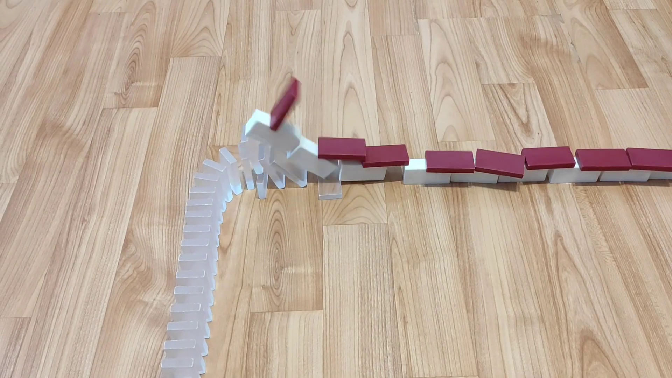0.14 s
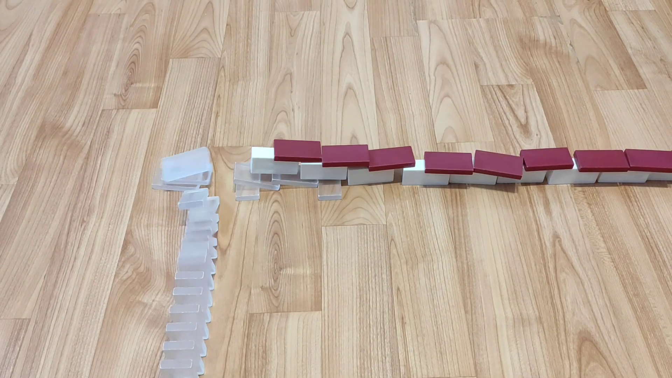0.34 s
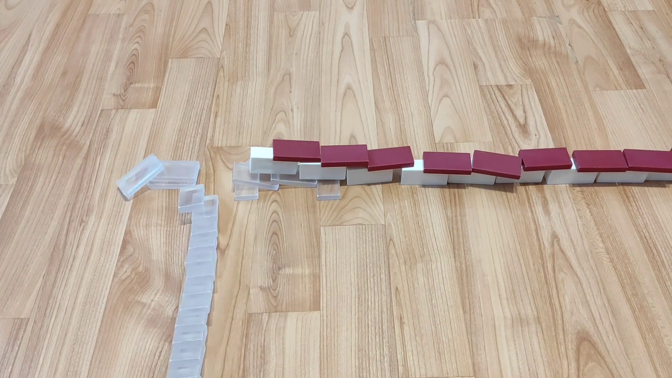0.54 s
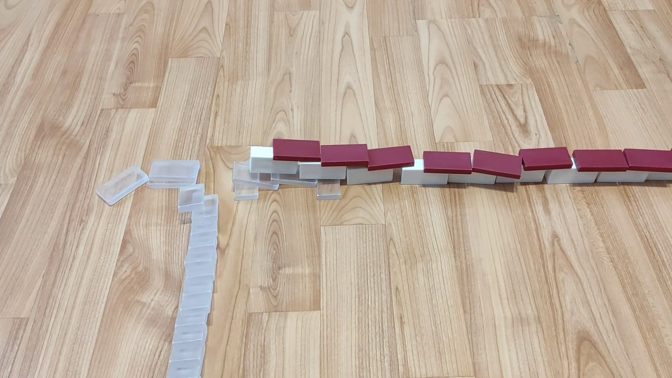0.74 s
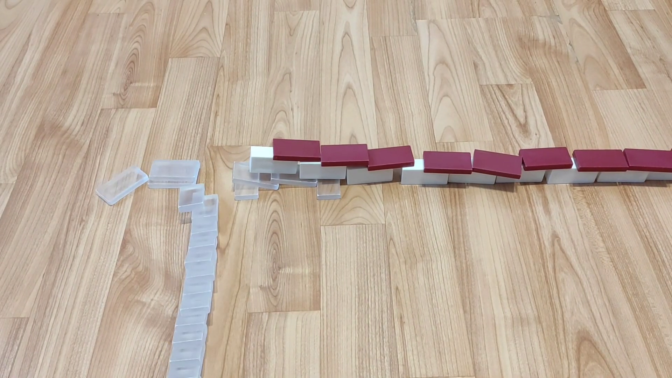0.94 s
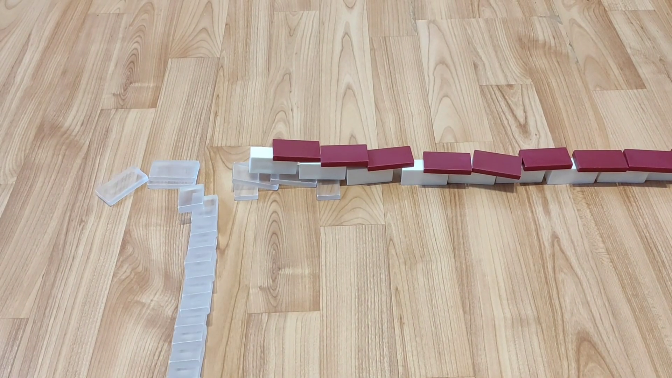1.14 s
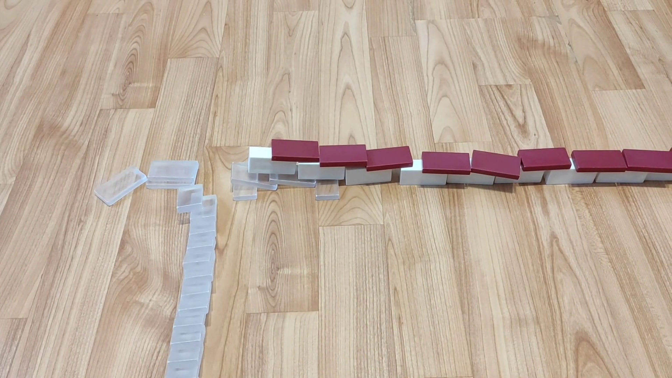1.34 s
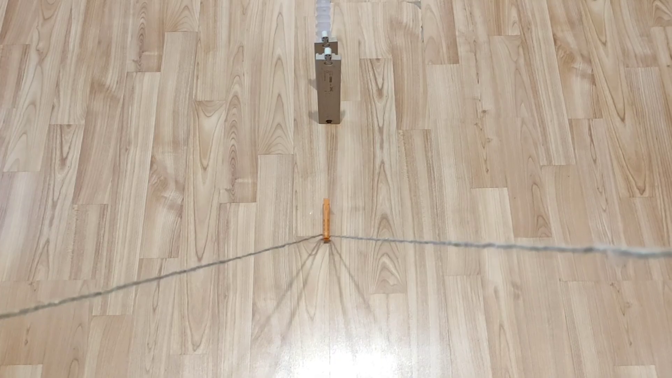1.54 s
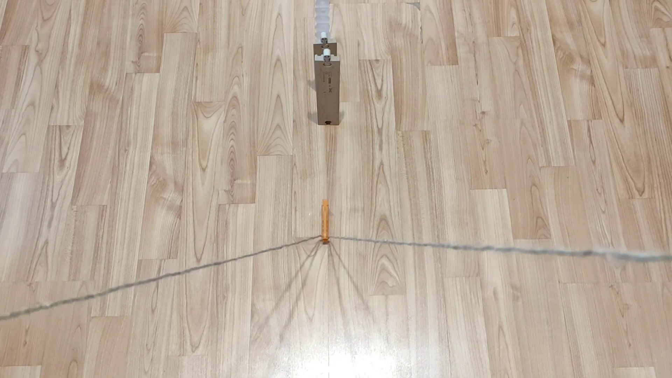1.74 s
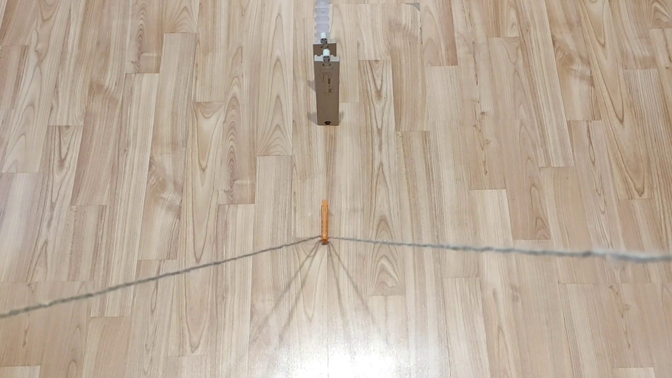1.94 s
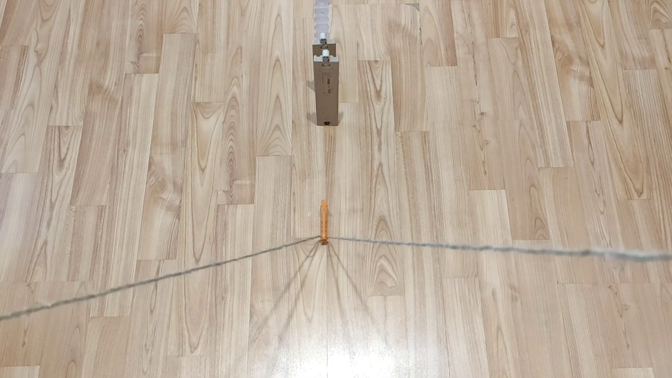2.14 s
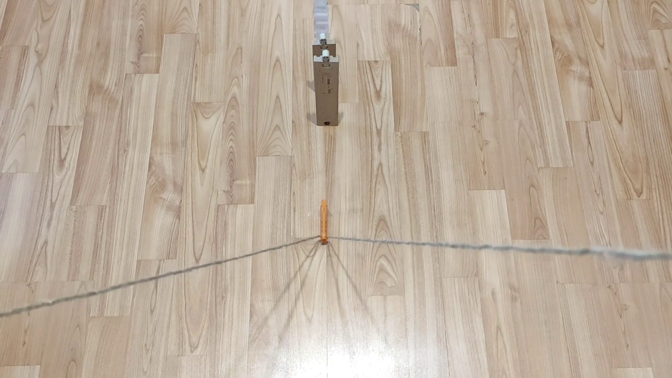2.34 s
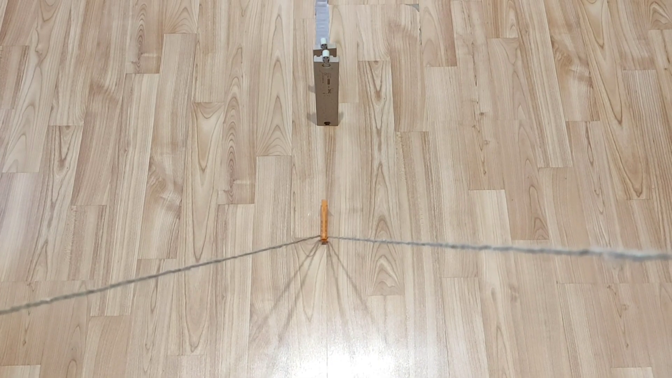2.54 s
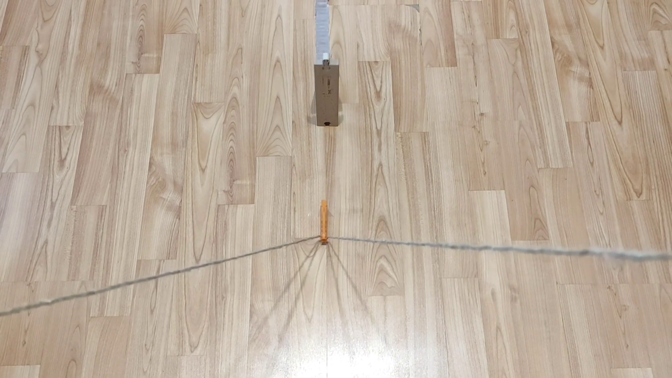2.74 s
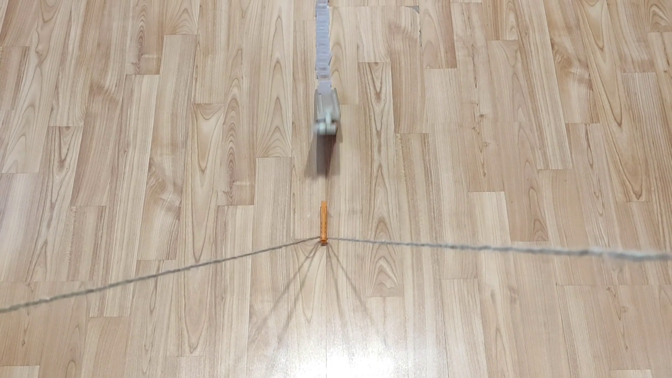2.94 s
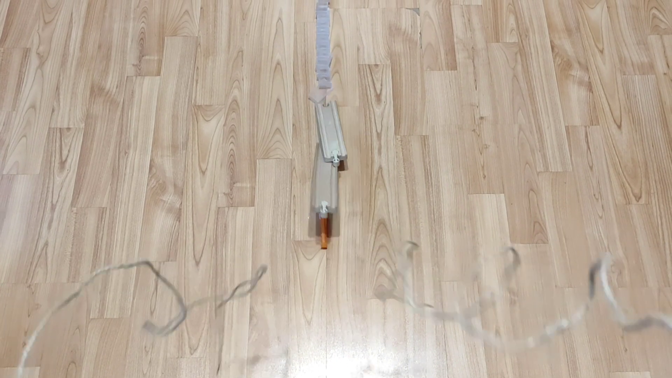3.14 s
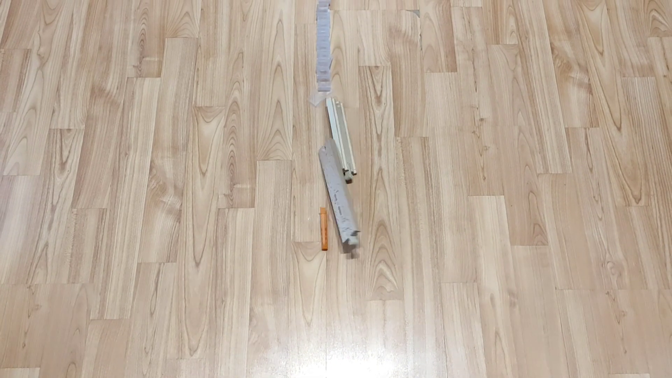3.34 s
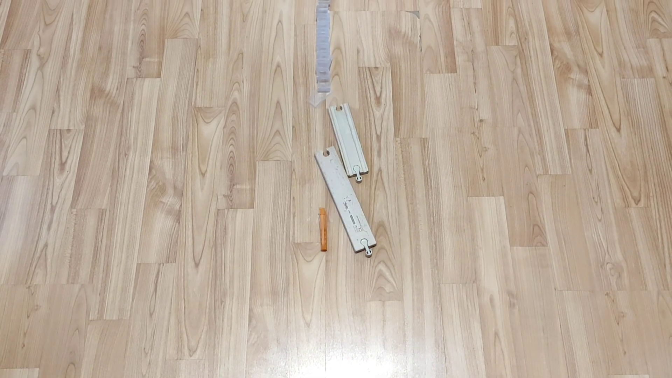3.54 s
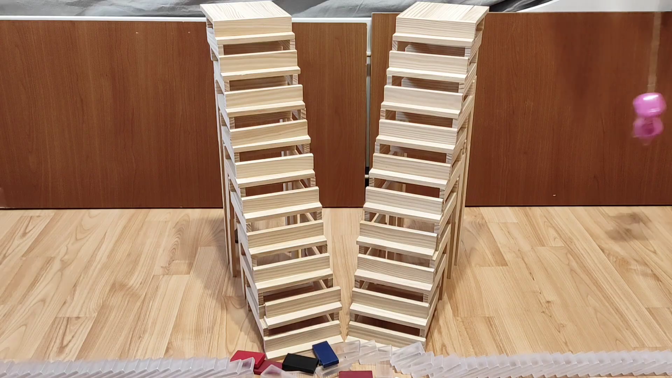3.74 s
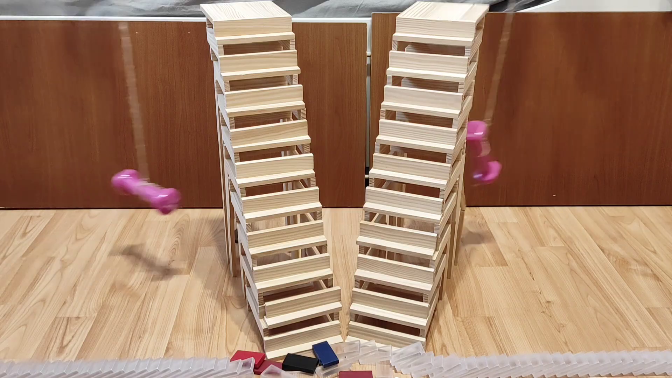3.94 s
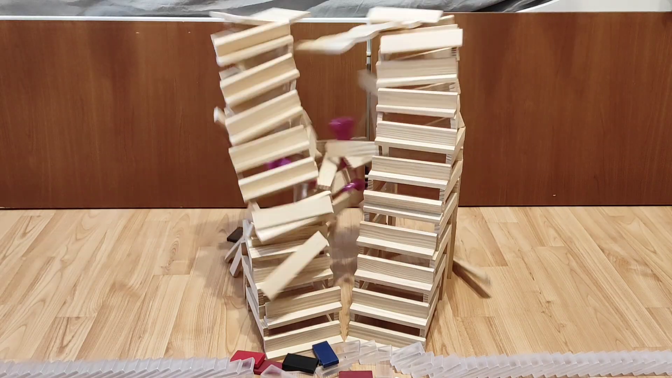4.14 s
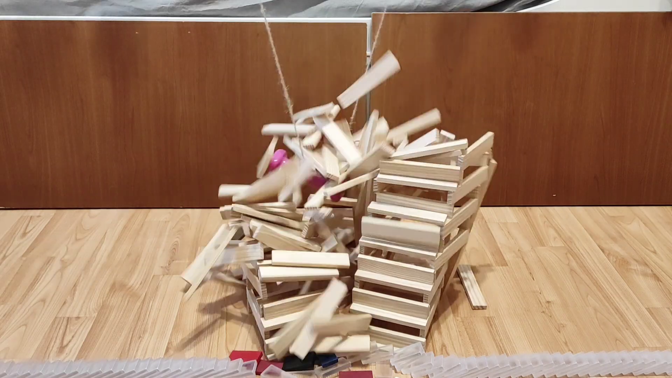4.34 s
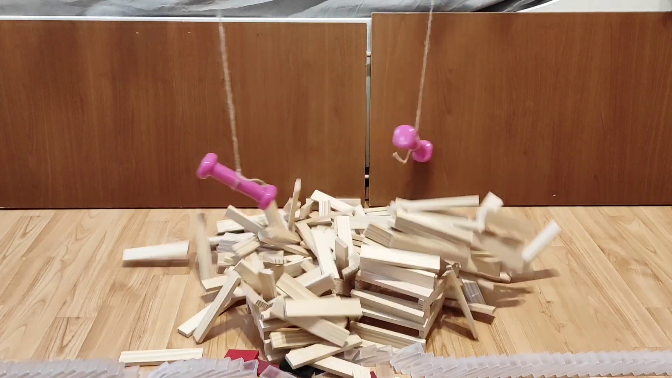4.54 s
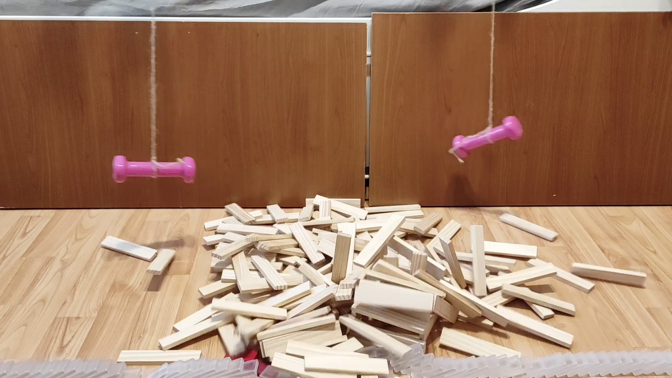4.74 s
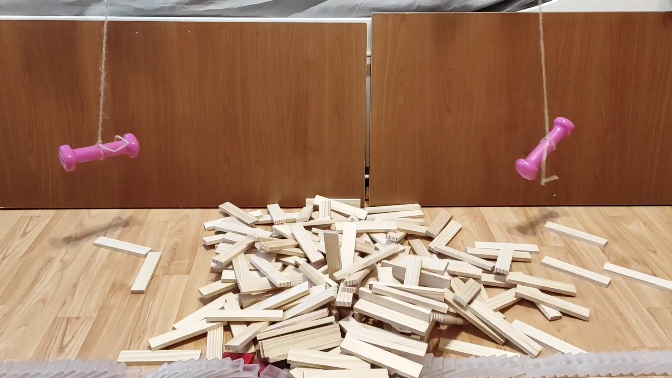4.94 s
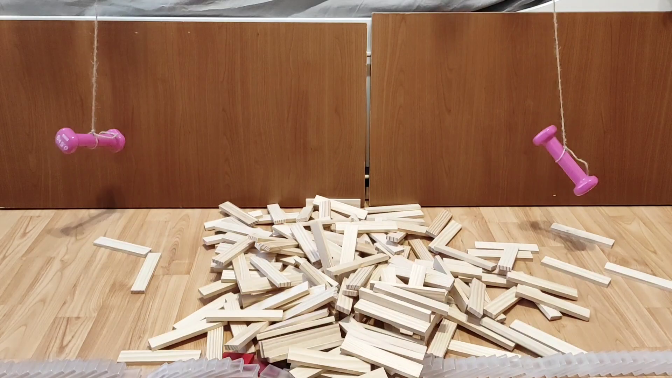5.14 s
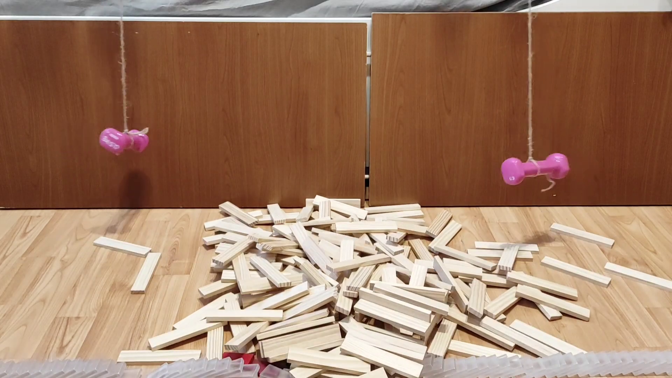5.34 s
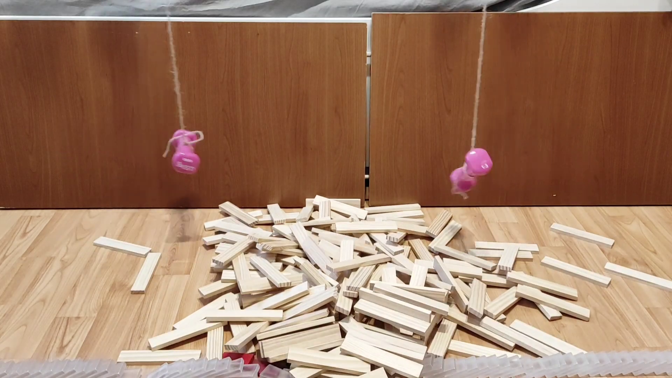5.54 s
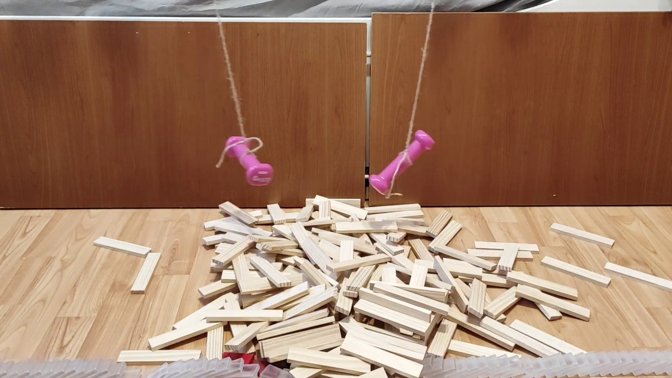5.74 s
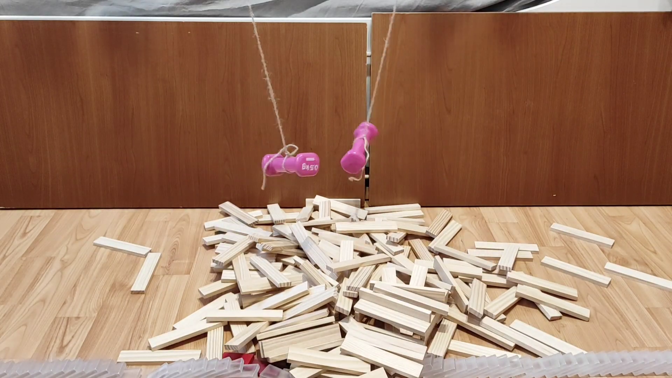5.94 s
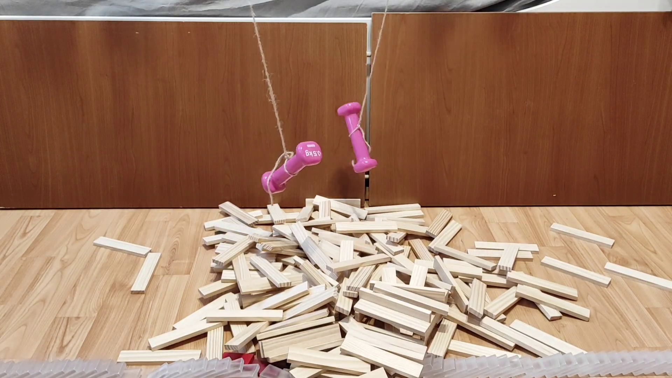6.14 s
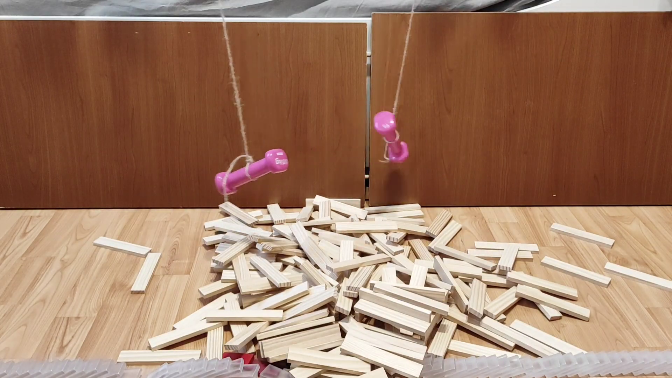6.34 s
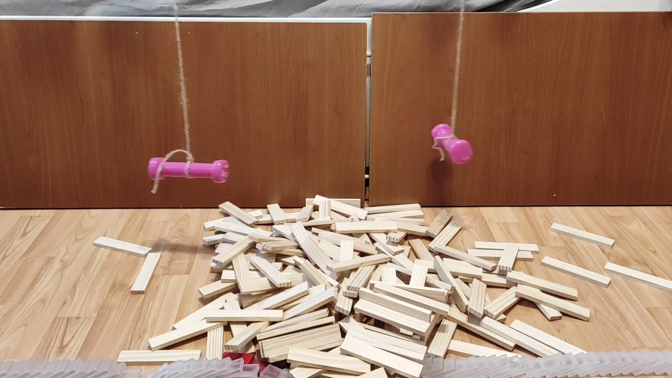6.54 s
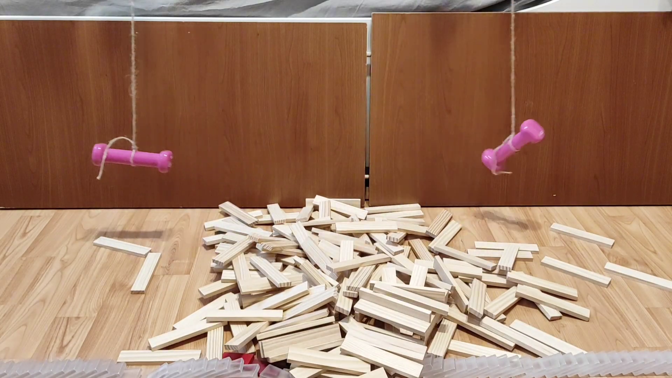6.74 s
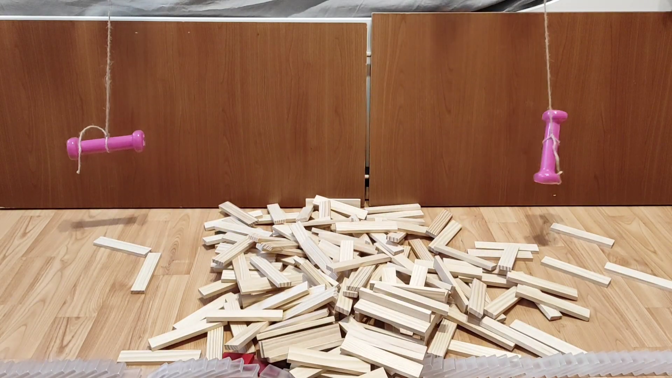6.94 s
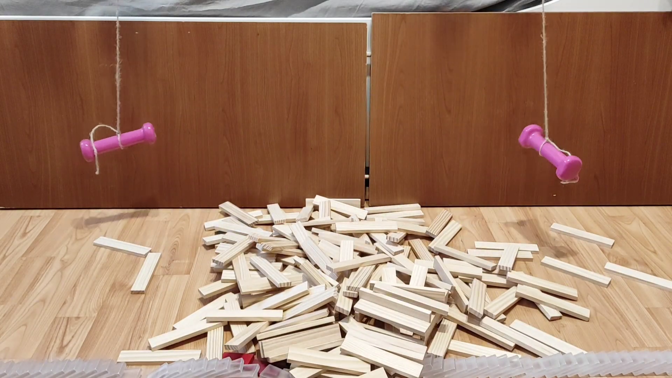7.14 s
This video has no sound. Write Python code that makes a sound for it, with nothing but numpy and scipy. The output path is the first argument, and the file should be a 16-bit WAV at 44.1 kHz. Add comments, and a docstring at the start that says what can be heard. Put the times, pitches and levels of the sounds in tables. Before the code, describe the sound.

Fast, even plastic domino clatter on a laminate floor, a short lull, a few wooden knocks, then a loud cascade of collapsing wooden planks.

```python
"""A chain reaction on a laminate floor in a small room, over house murmur and microphone hiss (shaped noise).
0 s: stacked blocks tumble. 0.24 s: a long row of plastic dominoes topples at a nearly even pace.
2.8 s: two wooden track pieces are knocked over; from 3.5 s one bounces. 4 s: swinging weights bring down
two towers of wooden planks, until 5.4 s; the murmur stays. Contacts are noise bursts with thud, clack, tick,
ringing modes and a room tail; clear knocks are decaying tone pairs; low shudder follows the clatter."""
import sys
import numpy as np
from scipy import signal
from scipy.fft import rfft, irfft
from scipy.io import wavfile

SR = 44100
rng = np.random.default_rng(int(sys.argv[2]) if len(sys.argv) > 2 else 0)


def store_pcm(level_fs):
    """Save levels as 16-bit WAV."""
    pcm = np.round(np.clip(level_fs, -1, 1) * 32767).astype(np.int16)
    wavfile.write(sys.argv[1], SR, np.atleast_2d(pcm).T)


N = 321048


def from_db(db):
    """Decibels to amplitude gain; 2 * dB gives the power gain."""
    return 10 ** (np.asarray(db) / 20)


def in_time(rows, outside):
    """Value columns of a (t/s, ...) table, interpolated per sample; outside=None holds the end values."""
    t_s, *columns = np.transpose(rows)
    return np.array([np.interp(np.arange(N) / SR, t_s, c, outside, outside) for c in columns])


def at_hz(points, hz):
    """Read a (f/Hz, value) table on a log-frequency axis."""
    table_hz, values = np.array(points).T
    return np.interp(np.log(hz + 1e-9), np.log(table_hz), values)


def spread_over(energy, seconds):
    """Energy let out along an exponential of the given time constant."""
    fade = np.exp(-1 / (seconds * SR))
    return signal.lfilter([1 - fade], [1, -fade], energy + 1e-30)


def stereo_noise(size, likeness):
    """Spectra of two noises with the given left-right correlation at each frequency."""
    hz = np.arange(size // 2 + 1) * SR / size
    mid, side = rfft(rng.standard_normal((2, size)))
    alike = np.clip(at_hz(likeness, hz), -1, 1)
    return hz, np.sqrt(1 + alike) * mid + np.sqrt(1 - alike) * side * [[1], [-1]]


def resonance(x, hz, width_hz):
    """Two-pole resonance, gain 1 on top."""
    r = np.exp(-np.pi * width_hz / SR)
    numerator = np.array([1, 0, -1]) * (1 - r * r) / 2
    return signal.lfilter(numerator, [1, -2 * r * np.cos(2 * np.pi * hz / SR), r * r], x)


def random_contacts(per_s, spread_db):
    """Contacts at random moments, a few much harder than the rest; mean power 1."""
    hardness_db = spread_db * np.minimum(rng.exponential(1, N), 3.0)
    energy = from_db(2 * hardness_db) * (rng.random(N) < per_s / SR)
    return energy / energy.mean()


def thud_clack_tick(strength_db, sharpness_db, clack_db):
    """A flat landing thuds, an edge-on one ticks."""
    return np.array([strength_db - sharpness_db, strength_db + clack_db, strength_db + sharpness_db])


def ringing_alike(blows, ring_db):
    """The same ringing for every blow of a table."""
    return [(*row, ring_db) for row in blows]


# Bands of a contact: lowest f/Hz, highest f/Hz, type (0 thud, 1 clack, 2 tick)
PARTS = [(15, 250, 0), (250, 1300, 0), (1300, 4500, 1), (4500, 9500, 2), (9500, 19000, 2)]


def body(colour, size=8192):
    """Minimum-phase broad response split into PARTS, with thud, clack and tick each scaled to unit power."""
    hz = np.arange(size // 2 + 1) * SR / size
    cepstrum = irfft(np.log(from_db(at_hz(colour, hz))))
    cepstrum[1:size // 2] *= 2
    cepstrum[size // 2 + 1:] = 0
    whole = irfft(np.exp(rfft(cepstrum)))
    bands = [signal.butter(3, [low, high], "band", fs=SR, output="sos") for low, high, _ in PARTS]
    parts = np.array([signal.sosfilt(band, whole) for band in bands])
    types = [kind for _, _, kind in PARTS]
    type_power = np.bincount(types, np.sum(parts ** 2, axis=1))
    scale = 1 / np.sqrt(type_power)[types]
    return parts * scale[:, None], scale


# Left-right correlation of contact noise: f/Hz, correlation
ROOM_LIKENESS = [(60, .4), (180, .7), (550, .75), (1400, .45), (3000, .2), (4500, 0)]
# Room decay, one per part: T60/s
ROOM_T60_S = [0.13, 0.4, 0.37, 0.29, 0.11]
# Reverberant over direct energy, one per part, before each source's room_db: level/dB
REVERB_DB = [5.5, 4, 3.7, 7.3, 5.5]
RISE_S, ECHO_BUILD_S = 0.00088, 0.0014
CRACK_DB = -4   # sharp first touch, against the burst
DIRECT_LIKENESS = .25   # share of direct burst power common to both ports
STRIKE_LUCK_DB = 2.5   # uneven excitation of each mode by single blows


def struck(contacts, clatter, blows, clack_db, colour, modes, burst_s, blow_db, room_db, luck_db,
           ring_room_db=0.0, loose_ring_db=0, board_hz=None):
    """Each contact drives broad body and modes with a crack, a short noise burst and a diffuse room tail."""
    loose_clack_db, blow_clack_db = clack_db
    strength_db, sharpness_db = in_time(clatter, outside=None)
    running = in_time([(clatter[0][0], 1), (clatter[-1][0], 1)], outside=0)
    dense = contacts * running * from_db(2 * thud_clack_tick(strength_db, sharpness_db, loose_clack_db))
    energy = np.array([dense, dense])   # port, type, sample
    ringing = np.full(N, from_db(2 * loose_ring_db))
    blow_at = [round(row[0] * SR) for row in blows]
    for at, (_, db, sharp_db, pan_db, ring_db) in zip(blow_at, blows):
        sides = from_db([[pan_db], [-pan_db]])
        levels_db = thud_clack_tick(db, sharp_db, blow_clack_db) + blow_db
        energy[:, :, at] += sides * from_db(2 * levels_db)
        ringing[at] = from_db(2 * ring_db)

    busy = np.flatnonzero(energy.sum(axis=(0, 1)) > 1e-9)
    span = slice(busy[0], min(busy[-1] + SR // 2, N))
    energy = energy[:, :, span]
    noise = irfft(stereo_noise(N, ROOM_LIKENESS)[1], N)[:, span] / np.sqrt(2)
    length = noise.shape[1]
    rising = spread_over(energy, RISE_S)
    latest = np.maximum.accumulate(np.arange(length) * (energy.sum(axis=(0, 1)) > 0))
    signs = rng.choice([-1, 1], noise.shape)

    def held(weight):
        """Each contact keeps its weight until the next one."""
        return np.broadcast_to(weight, latest.shape)[latest]

    def force(k, weight, extra_db):
        """Crack, direct burst and room tail of part k, on randomly shifted noise."""
        kind = PARTS[k][2]
        burst = spread_over(rising[:, kind] * held(weight), burst_s)
        tail = spread_over(spread_over(burst.mean(axis=0), ECHO_BUILD_S), ROOM_T60_S[k] / np.log(1e6))
        wet = from_db(2 * (REVERB_DB[k] + room_db + extra_db))
        diffuse, own, shared = (np.roll(noise, shift, axis=1) for shift in rng.integers(2000, 40000, 3))
        direct = np.sqrt(DIRECT_LIKENESS) * shared[:1] + np.sqrt(1 - DIRECT_LIKENESS) * own
        sign = signs if kind else signs[:1]   # only thud cracks have one sign in both ports
        crack = from_db(CRACK_DB) * sign * np.sqrt(energy[:, kind] * weight)
        return (crack + np.sqrt(burst) * direct + np.sqrt(wet * tail) * diffuse) / np.sqrt(1 + wet)

    out = np.zeros((2, N))
    parts, scale = body(colour)
    for k, part in enumerate(parts):
        out[:, span] += signal.fftconvolve(force(k, 0.67, 0), part[None], axes=1)[:, :length]
    for hz, width_hz, lift_db in modes:
        k = sum(hz > high for _, high, _ in PARTS)
        luck = from_db(2 * luck_db * rng.standard_normal(N))   # each loose contact finds a mode anew
        luck /= luck.mean()
        luck[blow_at] = from_db(2 * STRIKE_LUCK_DB * rng.standard_normal(len(blow_at)))
        weight = (ringing * luck)[span]
        if board_hz is not None and PARTS[k][2] == 0:   # only boards near the front ring
            weight = weight * np.exp(-(np.log(hz / board_hz[span]) / 0.087) ** 2)
        gain = scale[k] * from_db(at_hz(colour, hz) + lift_db)
        out[:, span] += gain * resonance(force(k, weight, ring_room_db), hz, width_hz)
    return out


# Left-right correlation of the murmur: f/Hz, correlation
QUIET_LIKENESS = [(60, 0.57), (240, 0.13), (950, 0.06), (3770, 0.01), (15000, 0.17)]
# Relative spectrum of murmur and hiss: f/Hz, level/dB
ROOM_TONE = [(5.9, -23), (10, 2), (18, -0.5), (27, -14.5), (80, -13), (99, -6.5), (171, -24), (194, -11.5),
             (264, -16.5), (370, -11.5), (474, -23), (520, -18.5), (588, -25.5), (7500, -47.5),
             (11400, -50), (16000, -66)]
ROOM_TONE_DB, ROOM_TONE_PAN_DB = -63, 5   # centre level; left minus right
MURMUR_WAVER_DB, MURMUR_WAVER_S = 1.5, .25   # rms depth; smoothing time


def room_tone():
    """House murmur and microphone hiss: shaped stereo noise whose level wavers slowly."""
    hz, noise = stereo_noise(N, QUIET_LIKENESS)
    tone = irfft(noise * from_db(at_hz(ROOM_TONE, hz)), N)
    sides = from_db(np.array([[.5], [-.5]]) * ROOM_TONE_PAN_DB)
    waver = spread_over(spread_over(rng.standard_normal(N), MURMUR_WAVER_S), MURMUR_WAVER_S)
    level_db = ROOM_TONE_DB + MURMUR_WAVER_DB * waver / waver.std()
    return from_db(level_db) * sides * tone / tone.mean(axis=0).std()


# Loose block contacts: t/s, relative level/dB, sharpness/dB
STACK_CLATTER = [(0.0, -30.5, 1), (0.326, -27.5, 9), (0.46, -39.5, 15)]
# Block blows: t/s, relative level/dB, sharpness/dB, left minus right/dB
STACK_BLOWS = [(0.0364, -14.5, 7, 6.5), (0.0455, -11.5, 8.5, -5), (0.1084, -21, -1.5, -1),
               (0.1358, -8, 4.5, 0.5), (0.1511, -15.5, 6.5, -3.5), (0.1764, -14, 6, -1.5),
               (0.1855, -7, 3.5, -5), (0.2005, -12.5, 3.5, 2.5), (0.2124, -13.5, 7.5, -4),
               (0.2748, -14.5, 7, -4), (0.3282, -17, 4.5, -7.5), (0.366, -9.5, 7, -4.5)]
# Broad colour of the blocks: f/Hz, relative level/dB
STACK_COLOUR = [(24, -58.5), (40, -19.5), (312, -9.5), (630, 6), (896, 5.5), (1410, -9), (2260, -7),
                (6170, -2), (8130, 6.5), (10400, -13.5), (12100, -18), (16000, -26)]
# Block ringing: f/Hz, width/Hz, level over broad colour/dB
STACK_MODES = [(590, 130, -3), (1100, 70, 5.5), (2270, 86, 1), (2980, 160, -7)]


def tumbling_blocks():
    """Stacked blocks collide in dense random contacts and single blows; short bursts excite their modes."""
    return struck(random_contacts(400, spread_db=2), STACK_CLATTER, ringing_alike(STACK_BLOWS, ring_db=4.5),
                  clack_db=(5, -1),   # loose contacts, single blows
                  colour=STACK_COLOUR, modes=STACK_MODES,
                  burst_s=0.0013, blow_db=17.0, room_db=-10, luck_db=-0.5)


# Low swells: centre t/s, half width/s, level/dB
SWELLS = [(1.1, 0.18, -50.5), (3.55, 0.11, -53), (4.1, 0.067, -52.5), (4.55, 0.2, -40)]
SHUDDER_BELOW_DB, SHUDDER_S = -51.5, 0.055   # level against clatter; smoothing time


def shudder(clatter):
    """22-100 Hz noise, unrelated in the two ports; follows the clatter and swells now and then."""
    band = signal.butter(3, [22.0, 100.0], "band", fs=SR, output="sos")
    low = signal.sosfilt(band, rng.standard_normal((2, N)))
    power = from_db(2 * SHUDDER_BELOW_DB) * spread_over(np.mean(clatter ** 2, axis=0), SHUDDER_S)
    for t_s, half_s, db in SWELLS:
        power = power + from_db(2 * db) * np.exp(-((np.arange(N) / SR - t_s) / half_s) ** 4)
    return np.sqrt(power) * low / low.mean(axis=0).std()


# Clear knocks: t/s, main tone's starting level/dB before room and filters, f/Hz, T60/s before cycle limit
NOTES = [(0.038, -17, 680, 0.03), (0.094, -19, 600, 0.04), (0.108, -19, 644, 0.03),
         (0.138, -18, 600, 0.043), (0.186, -9, 2730, 0.017), (0.212, -14, 657, 0.023),
         (0.3665, -18, 600, 0.038), (2.763, -20.5, 807, 0.066), (2.8575, -23, 817, 0.051),
         (2.858, -34, 2440, 0.066), (3.0842, -16, 2737, 0.13), (3.237, -19.5, 5350, .06),
         (3.307, -14, 2440, 0.07), (3.3595, -10.5, 900, 0.012), (3.391, -20, 696, 0.074),
         (3.4443, -13.5, 1060, 0.015), (3.479, -8.5, 2568, 0.02), (3.48, -12.5, 620, 0.025),
         (3.479, -9, 5300, 0.02), (3.4915, -11, 3710, 0.0497), (3.608, -8.5, 3610, 0.038),
         (3.738, -9.5, 3687, 0.027), (3.804, -22.5, 2620, 0.063), (4.0146, -21.5, 360, 0.029),
         (4.031, -14.5, 500, 0.025), (4.158, -19.5, 2217, 0.22), (4.194, -11, 1100, 0.02),
         (4.245, -19, 561, 0.17), (4.302, -12.5, 598, 0.2), (4.43, -11.5, 905, 0.028),
         (4.611, -14, 528, 0.13), (4.719, -13, 2658, .08), (4.842, -18.5, 600, 0.068),
         (5.039, -17, 1100, .04), (5.046, -16, 2734, 0.098), (5.085, -26, 790, 0.036),
         (5.106, -23.5, 599, 0.12), (5.15, -19.5, 600, 0.1), (5.278, -21, 900, .025),
         (5.294, -22.5, 2682, .06), (5.299, -27.5, 2227, 0.19), (5.328, -20, 1100, .015),
         (5.354, -22, 2900, 0.12), (5.393, -13.5, 1250, 0.018)]
NOTE_PAN_DB, NOTE_ROOM_DB, NOTE_ROOM_T60_S = 1, -1, 0.22
PARTNER_DB, PARTNER_SPREAD, LONGEST_RING_CYCLES = -4, .05, 320   # spread: largest fraction off pitch


def notes():
    """Each knock is a decaying pair of close tones, with a separate diffuse room tail in each port."""
    dry, t = np.zeros(N + SR), np.arange(SR // 2) / SR
    knocks = [*NOTES, *loose_notes()]
    for (t_s, db, hz, t60_s), apart in zip(knocks, rng.uniform(-1, 1, len(knocks))):
        tone = np.sin(2 * np.pi * hz * t)
        partner = from_db(PARTNER_DB) * np.sin(2 * np.pi * hz * (1 + PARTNER_SPREAD * apart) * t)
        t60_s = np.clip(t60_s, .003, LONGEST_RING_CYCLES / hz)
        dry[round(t_s * SR):][:len(t)] += from_db(db - 60 * t / t60_s) * (tone + partner)
    dry = signal.sosfilt(signal.butter(2, 200, "high", fs=SR, output="sos"), dry)
    tail = rng.standard_normal((2, len(t))) * from_db(-60 * t / NOTE_ROOM_T60_S) * (t > .002)
    tail *= from_db(NOTE_ROOM_DB) / np.sqrt(np.sum(tail ** 2, axis=1, keepdims=True))
    wet = signal.fftconvolve(dry[None], tail, axes=1)[:, :N]
    return dry[:N] * from_db(np.array([[.5], [-.5]]) * NOTE_PAN_DB) + wet


# Progress of the row: t/s, dominoes fallen so far
FALLEN = [(0.24, 0), (0.4953, 18), (0.61, 25), (0.7454, 35), (0.8552, 43), (0.965, 51), (1.0967, 61),
          (1.2024, 69), (1.3346, 79), (1.4743, 89), (1.5546, 95), (1.7013, 106), (1.807, 114),
          (1.8884, 120), (2.038, 131), (2.1448, 139), (2.2994, 150), (2.4122, 158), (2.53, 166)]


def falling_row(jitter=0.076, spread_db=2.3, loose_share=.3):
    """One slap per falling domino at a nearly even pace, loose knocks between; mean power 1."""
    fallen = in_time(FALLEN, outside=None)[0]
    k = np.arange(int(fallen[-1]) - 1)
    timing, strength = rng.standard_normal((2, len(k)))
    slap_at = np.searchsorted(fallen, k + 1 + jitter * np.clip(timing, -2, 2))   # jitter in dominoes
    slaps = np.zeros(N)
    slaps[slap_at] = from_db(2 * spread_db * strength)
    loose = random_contacts(260, spread_db=4.0)
    return (1 - loose_share) * slaps / slaps.mean() + loose_share * loose


# Row clatter: t/s, relative level/dB
ROW_CLATTER = [(0.24, -31.5), (0.45, -38), (0.47, -23), (0.72, -23.5), (0.88, -26), (0.98, -25),
               (1.35, -24.5), (1.43, -27), (1.56, -22.5), (1.7, -25), (2.14, -26.5), (2.31, -26.5),
               (2.43, -22), (2.5, -37), (2.53, -20.5)]
# Domino blows: t/s, relative level/dB, sharpness/dB, left minus right/dB
DOMINO_BLOWS = [(0.4618, -11, 13, -8), (0.4953, -8.5, 19.2, -4), (0.5706, -7, 11, -17),
                (0.61, -2, 7.1, 0.5), (0.6194, -16.5, 11, -10.5), (0.7454, -12.5, 22, 3.5),
                (0.7571, -7, 13, -2.5), (0.7748, -11.5, 4, -11), (0.965, -7, 4.3, 9), (1.0967, -10, 11, 5),
                (1.1221, -11, 9, -2), (1.2024, -14.5, 6.9, 0), (2.2445, -15, 13, -6.5),
                (2.4122, -9, 19, 2.5), (2.4537, -8, 15, 3.5), (2.4955, -5.5, 11.3, -8)]
# Broad colour of the dominoes: f/Hz, relative level/dB
DOMINO_COLOUR = [(18, -11.5), (30, -30.5), (121, -21), (259, -6.5), (540, 1), (1500, 5.5), (2750, 8),
                 (4530, -16.5), (5310, -13), (6210, -13.5), (7270, -4.5), (11100, -28), (13700, -32),
                 (14800, -111), (16000, -68.5)]
# Ringing of dominoes and boards below: f/Hz, width/Hz, level over broad colour/dB
DOMINO_MODES = [(5345, 75, 11), (5850, 90, 8.5), (12200, 120, 15), (13230, 250, 13), (360, 110, 13),
                (470, 100, 8), (550, 110, 7), (650, 130, 7), (760, 150, 7), (890, 170, 7)]
# Board pitch under the front: t/s, f/Hz
BOARD_PITCH = [(0.45, 572), (0.87, 555), (1.02, 715), (1.14, 600), (1.32, 717), (1.5, 452), (1.81, 547),
               (1.94, 636), (2.26, 590), (2.36, 690), (2.53, 750)]


def domino_row():
    """Plastic slaps tick and clack; board modes near the moving front's pitch ring in the thud."""
    clatter = [(t_s, db, 6) for t_s, db in ROW_CLATTER]   # constant 6 dB sharpness
    return struck(falling_row(), clatter, ringing_alike(DOMINO_BLOWS, ring_db=-2),
                  clack_db=(-3.5, 2.2), colour=DOMINO_COLOUR, modes=DOMINO_MODES,
                  burst_s=0.0025, blow_db=10.5, room_db=-4, luck_db=2.0,
                  board_hz=in_time(BOARD_PITCH, outside=None)[0])


# Loose track contacts: t/s, relative level/dB, sharpness/dB
TRACK_RATTLE = [(3.062, -50.5, -4.5), (3.09, -35.5, -5), (3.254, -28.5, 10.5), (3.47, -51, -13.5)]
# Track blows: t/s, relative level/dB, sharpness/dB, left minus right/dB, ringing/dB
TRACK_BLOWS = [(2.7612, -23, -2, 12, -10), (2.8578, -32, -7, 3, -4.5), (2.9104, -41.5, -16.5, 0, -15),
               (3.0837, -17, 8, 4.5, -9), (3.0932, -17.5, 2, -3, 3.5), (3.1835, -22.5, 7, 0, -17.5),
               (3.241, -21.5, 6, -7.5, -11), (3.31, -24.5, 1.5, -10, -5), (3.3593, -13.5, -2, -5, -1),
               (3.392, -31, -12.5, 3, 2), (3.445, -22.5, -3.5, 6, -4)]
# Broad colour of the track pieces: f/Hz, relative level/dB
TRACK_COLOUR = [(24, -58.5), (40, -32.5), (305, -16), (345, -4.5), (392, -16.5), (479, -5), (1550, -10.5),
                (2380, -8), (2980, -10.5), (7360, -4.5), (13800, -36.5), (16000, -24.5)]
# Track ringing: f/Hz, width/Hz, level over broad colour/dB
TRACK_MODES = [(474.4, 24, 4.5), (900, 117, -5.5), (2440, 68, 12), (6150, 118.5, -8)]


def toppling_track():
    """Wooden track pieces knock over: single blows and sparse rattle excite the wood's modes."""
    return struck(random_contacts(200, spread_db=3.5), TRACK_RATTLE, TRACK_BLOWS,
                  clack_db=(0.4, 1), colour=TRACK_COLOUR, modes=TRACK_MODES,
                  burst_s=0.0025, blow_db=24.0, room_db=-1.5, luck_db=3.0,
                  ring_room_db=-10, loose_ring_db=-5)


# Loose contacts of the upper piece: t/s, relative level/dB, sharpness/dB
BOUNCE_RATTLE = [(3.49, -30.5, 17.5), (3.558, -48.5, 0.5), (3.658, -35, 11), (3.712, -44, -4.5),
                 (3.87, -32, -2.5)]
# Bounces: t/s, relative level/dB, sharpness/dB, left minus right/dB, ringing/dB
BOUNCE_BLOWS = [(3.491, -12.5, -3, -0.5, 4), (3.496, -25, 3, 10, -0.5), (3.6095, -14.5, 0, -1, 1),
                (3.6361, -15, -2.5, -1, -1), (3.737, -18, -1, 2.5, 5), (3.745, -22.5, 9, 1, -1),
                (3.8028, -19, 1.5, 0.5, -3.5)]
# Broad colour of the bouncing piece: f/Hz, relative level/dB
BOUNCE_COLOUR = [(18, -63.5), (30, -47.5), (303, -12), (600, -4), (1350, -18), (2680, -4.5), (3220, -19),
                 (3670, -7.5), (4780, -9.5), (6050, 0.5), (10500, -18), (16000, -59)]
# Ringing of the bouncing piece: f/Hz, width/Hz, level over broad colour/dB
BOUNCE_MODES = [(590, 51, 1.5), (2692, 38, 6.5), (3690, 180, 2.8), (5000, 100, 3), (5870, 140, 6),
                (7060, 180, 3), (8580, 180, 3.4)]


def bouncing_track():
    """The upper track piece bounces on the floor: each landing is a longer burst through its modes."""
    return struck(random_contacts(120, spread_db=4), BOUNCE_RATTLE, BOUNCE_BLOWS,
                  clack_db=(-18.5, 7.6), colour=BOUNCE_COLOUR, modes=BOUNCE_MODES,
                  burst_s=0.0063, blow_db=23.0, room_db=-1.0, luck_db=2.0,
                  ring_room_db=-7, loose_ring_db=-5)


# Loose plank contacts: t/s, relative level/dB, sharpness/dB
TOWER_COLLAPSE = [(4.03, -30.5, -5.5), (4.085, -15, 8), (4.2, -55, 2), (4.239, -16.5, 4), (4.5, -15.5, 3.5),
                  (4.884, -19.5, 4.5), (5.002, -29, 8), (5.094, -25.5, 0.5), (5.232, -47.5, -11.5),
                  (5.288, -43, -1), (5.4, -64, -9)]
# Plank blows: t/s, relative level/dB, sharpness/dB, left minus right/dB
PLANK_BLOWS = [(4.0144, -18, 2, 4), (4.0643, -31, 19, -6), (4.142, -24.5, 4.5, 19), (4.163, -28.5, 14, 18),
               (4.193, -16, 0, 4.5), (4.2439, -24, -2.5, 13), (4.283, -16, 3, -3), (4.446, -15, 0, 0),
               (4.7206, -10.5, -1, 6), (4.897, -12, 4.5, 2), (5.047, -20.5, 1.5, 2.5),
               (5.1438, -24.5, 14, -7.5), (5.1558, -14.5, 9, 8.5), (5.276, -26.5, 1, 8),
               (5.291, -28.5, 4, -10), (5.328, -28.5, 0.5, 5.5), (5.353, -24.5, 0, 9),
               (5.3908, -31.5, -6, 11)]
# Broad colour of the planks: f/Hz, relative level/dB
PLANK_COLOUR = [(15, -53.5), (25, -23), (127, -18.5), (201, -11), (407, -10), (595, -3), (700, -1),
                (1910, -9), (2710, -8.5), (3960, -15.5), (6810, 0), (8460, -6.5), (9680, -22.5),
                (14900, -34), (16200, -27.5)]
# Plank ringing: f/Hz, width/Hz, level over broad colour/dB
PLANK_MODES = [(195, 11, 4.4), (464.5, 20, 3.3), (600, 220, 1.296), (797, 48, 1.1), (1060, 13, 5.5),
               (1295, 100, 1), (2270, 38, 6.1), (2652, 78, 5.5), (2900, 57, 2.6)]


def collapsing_towers():
    """Falling wooden planks collide in dense contacts and single blows that excite their modes."""
    return struck(random_contacts(300, spread_db=2.5), TOWER_COLLAPSE,
                  ringing_alike(PLANK_BLOWS, ring_db=-8.5),
                  clack_db=(0.98, 4.9), colour=PLANK_COLOUR, modes=PLANK_MODES,
                  burst_s=0.00182, blow_db=22.5, room_db=1.5, luck_db=2.5)


def loose_notes(count=140, above_clatter_db=0.5, t60_s=0.044):
    """Knock rows while the towers fall: random times, plank modes up to 10 % off, 0-8 dB weaker at random."""
    when, which, tune, size = rng.random((count, 4)).T
    t_s, strength_db = np.transpose(TOWER_COLLAPSE)[:2]
    at_s = t_s[0] + when * (t_s[-1] - t_s[0])
    mode_hz = np.array(PLANK_MODES)[1:, 0]   # lowest mode left out
    hz = mode_hz[(which * len(mode_hz)).astype(int)] * (.9 + .2 * tune)
    db = np.interp(at_s, t_s, strength_db) + above_clatter_db - 8 * size
    return np.transpose([at_s, db, hz, np.full(count, t60_s)])


# Colour difference of the ports: f/Hz, left minus right/dB
PORT_BALANCE = [(60, 5), (130, 3), (290, 5), (640, 2.5), (1410, 5), (3100, 0), (6820, -1), (15000, 3)]
LEFT_LAG_S = .0001


def scene():
    """All pieces, heard by two ports a little apart: colour difference and left lag, then shudder and murmur."""
    pieces = (tumbling_blocks() + notes() + domino_row() + toppling_track()
              + bouncing_track() + collapsing_towers())
    hz = np.arange(N // 2 + 1) * SR / N
    ports = from_db(np.array([[.5], [-.5]]) * at_hz(PORT_BALANCE, hz))
    lag = np.exp(-2j * np.pi * hz * np.array([[LEFT_LAG_S], [0]]))
    clatter = irfft(rfft(pieces) * ports * lag, N)
    return clatter + shudder(clatter) + room_tone()


LIMIT_DB, SQUEEZE, ATTACK_S, RELEASE_DB_PER_S = -18.5, 0.26, 0.017, 150.5   # squeeze: dB cut per dB over
CUTOFF_HZ = 16700


def record(dry):
    """Gain control ducks a moment after each loud blow and recovers; peaks are rounded, the top is cut."""
    level_db = 10 * np.log10(spread_over(np.mean(dry ** 2, axis=0), 0.00021))
    over_db = SQUEEZE * np.maximum(level_db - LIMIT_DB, 0)
    ramp_db = RELEASE_DB_PER_S * np.arange(N) / SR
    held_db = np.maximum.accumulate(over_db + ramp_db) - ramp_db   # instant rise, linear release
    duck_db = spread_over(held_db, ATTACK_S)
    rounded = .9 * np.tanh(dry * from_db(-duck_db) / .9)
    return signal.sosfilt(signal.cheby2(14, 90, CUTOFF_HZ, fs=SR, output="sos"), rounded)


dry = scene()
out = record(dry)
store_pcm(out)
```